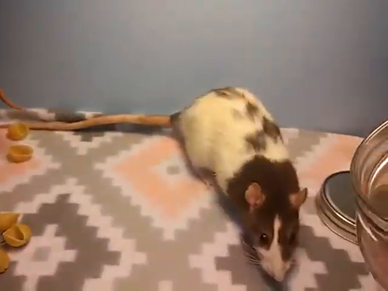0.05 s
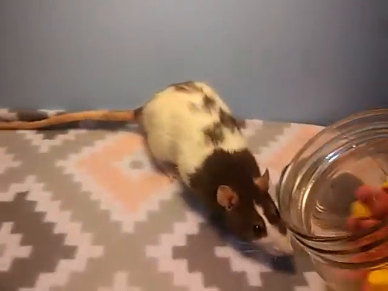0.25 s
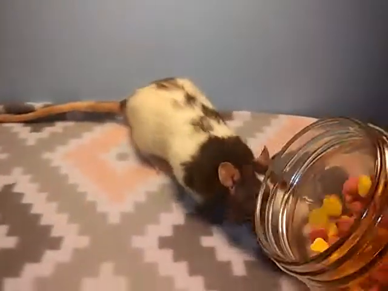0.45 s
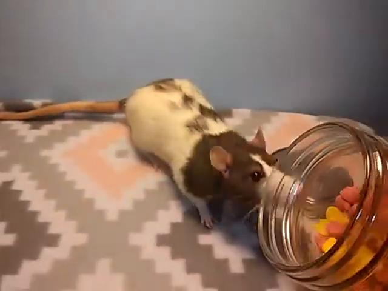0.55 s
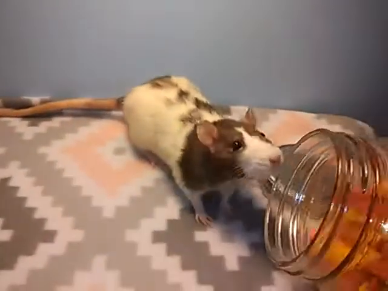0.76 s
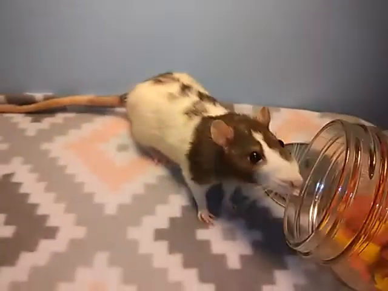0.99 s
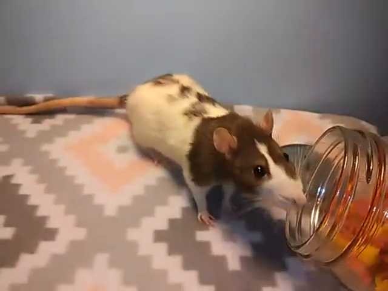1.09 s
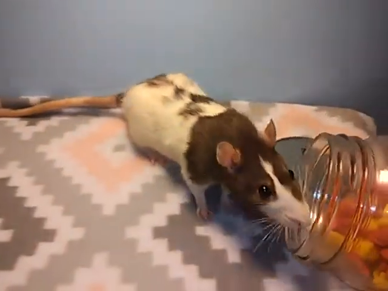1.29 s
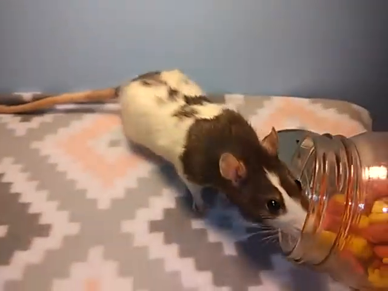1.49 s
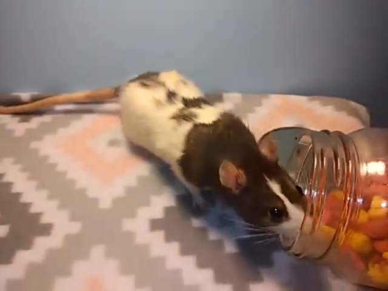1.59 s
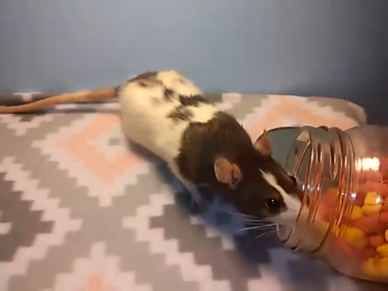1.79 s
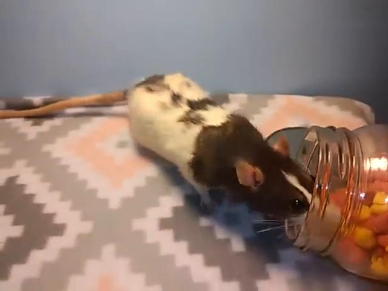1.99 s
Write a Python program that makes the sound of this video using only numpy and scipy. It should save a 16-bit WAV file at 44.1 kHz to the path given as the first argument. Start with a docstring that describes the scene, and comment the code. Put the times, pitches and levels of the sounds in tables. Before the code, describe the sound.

Dry pasta slides and clicks in a tilted glass jar, which clacks once against something hard.

```python
"""In a small room, a glass jar of dry pasta shells is tipped towards a rat, close by on the right.
The shells slide and tick: each contact makes a sharp crack, a brief ping from the shell and a
dull knock from the jar wall. Once, the jar chatters against something hard.
The room adds a short echo. Underneath are the rumble of the moving hand and a faint hum."""
import sys
import numpy as np
from scipy import signal
from scipy.fft import rfft, irfft, next_fast_len
from scipy.io import wavfile
from scipy.ndimage import uniform_filter1d, map_coordinates

SR = 44100
rng = np.random.default_rng(int(sys.argv[2]) if len(sys.argv) > 2 else 0)


def inscribe(sig):
    """Save sig as 16-bit PCM at rate SR to the path in sys.argv[1].

    A 1-D sig is mono; a 2-D sig holds one channel per row.
    Samples are clipped to [-1, 1] before scaling.
    """
    pcm = np.round(np.clip(np.atleast_2d(sig).T, -1, 1) * 32767)
    wavfile.write(sys.argv[1], SR, pcm.astype(np.int16))


N = 90404

# Shells landing. A fade is the time a sound takes to drop by 60 dB.
# start_s, crack_db, treble_tilt_db_per_octave, crack_fade_s, knock_db, ping_hz, ping_db
SHELL_HITS = [(0.1839, -46.5, 10, 0.024, -74, 9260, -55), (0.2072, -47.5, -4, 0.02, -57, 5100, -59),
              (0.216, -45.5, -11, 0.016, -52, 4900, -64), (0.2244, -46, -1.5, 0.008, -51, 8100, -61),
              (0.2457, -34, -0.5, 0.017, -54, 8400, -55), (0.251, -23, 3.5, 0.0084, -46.5, 8000, -30.5),
              (0.2637, -40, 1, 0.02, -55, 8050, -44), (0.268, -51, 9, 0.01, -46, 7800, -57),
              (0.277, -32.5, 6, 0.018, -47.5, 9640, -41), (0.2855, -42, 5, 0.007, -72, 9600, -43),
              (0.3147, -20, 10, 0.0088, -39, 7990, -29), (0.3226, -35, -1, 0.005, -39, 8060, -31.5),
              (0.331, -32.5, 3.5, 0.009, -40.5, 7970, -39), (0.3441, -38.5, -2, 0.022, -47, 8700, -44.5),
              (0.3592, -30.5, 6, 0.007, -48, 8440, -38), (0.365, -46, 19, 0.013, -60, 6760, -45),
              (0.388, -43, -2, 0.016, -57, 6630, -46), (0.397, -46, 5, 0.02, -73, 8350, -59),
              (0.4119, -39, -9.5, 0.0098, -43, 8000, -40), (0.427, -39, 4, 0.011, -43.5, 7640, -36.5),
              (0.4317, -39, -0.5, 0.0065, -53, 8200, -36), (0.4465, -54, -17, 0.011, -55, 5560, -60),
              (0.4673, -60, -10, 0.013, -74, 5730, -61), (0.474, -45.5, -15, 0.0082, -71, 7450, -51),
              (0.4813, -54, -4, 0.018, -63, 5600, -65), (0.4904, -32.5, 12, 0.012, -49, 7840, -35.5),
              (0.5235, -44.5, -7, 0.015, -72, 8700, -52), (0.553, -27.5, 8.5, 0.015, -45, 7900, -34),
              (0.562, -49.5, -9, 0.043, -66, 7800, -57), (0.5678, -53, -9, 0.0094, -60, 8000, -58),
              (0.5947, -40, -2.5, 0.014, -41.5, 8230, -42), (0.6415, -27.5, 6, 0.018, -37.5, 8080, -19),
              (0.741, -64, 11, 0.0098, -87, 5210, -55), (0.7712, -59.5, 2, 0.013, -58.5, 8000, -68),
              (0.7925, -53, -21, 0.026, -52.5, 4850, -63), (0.806, -46, -15, 0.017, -54, 8140, -51),
              (0.8167, -49.5, -21, 0.036, -59.5, 8240, -50.5), (0.8357, -47, 18, 0.0085, -40, 7800, -48),
              (0.8388, -43.5, -11, 0.007, -55, 8300, -42), (0.8547, -35.5, -9.5, 0.0042, -34, 8030, -38.5),
              (0.8624, -45, -13, 0.0095, -49.5, 8180, -50), (0.8801, -50, 4, 0.014, -53, 7970, -54),
              (0.8879, -43.5, -12.5, 0.038, -52.5, 7900, -50), (0.8941, -44, 1, 0.013, -43, 5470, -49),
              (0.947, -50, 20, 0.01, -71, 10740, -54), (0.969, -63, 13, 0.013, -61, 8000, -61),
              (0.9991, -53, 1, 0.021, -52, 8200, -50), (1.0452, -45.5, -7, 0.012, -59, 7940, -47.5),
              (1.507, -54, 3, 0.0096, -86, 9260, -61), (1.5999, -53, -15, 0.013, -48.5, 8440, -62),
              (1.6168, -53, 0.0, 0.008, -66, 7070, -46.5), (1.6264, -39, 1.5, 0.0085, -40, 8000, -32.5),
              (1.6318, -46, -7.5, 0.038, -47.5, 8000, -44), (1.642, -53, -9, 0.035, -50.5, 8100, -65),
              (1.663, -58, -1, 0.011, -56, 5550, -59), (1.6695, -69, -2, 0.033, -62, 5120, -62),
              (1.674, -60, -5.0, 0.016, -54.5, 7970, -68), (1.7841, -35, 3, 0.033, -38.5, 7770, -31),
              (1.791, -65, -4, 0.018, -60, 8140, -37.5), (1.806, -56, 0.5, 0.021, -54, 8010, -70),
              (1.827, -51.5, -3, 0.0067, -56.5, 8050, -47), (1.96, -56, -4, 0.017, -57, 7900, -56),
              (2.021, -53, 4.5, 0.02, -78, 6510, -48)]
# Tone of a shell's crack: pitch_hz, level_db
CRACK_TONE = [(300, -42), (700, -14.5), (950, -16.5), (1400, -9), (1900, -14), (2500, -1), (3100, -19),
              (3700, -4), (5500, 1), (7000, -2.5), (9000, 0.5), (11000, -4.5), (12500, -6.5),
              (14500, -19.5)]
# Notes of the damped jar wall: pitch_hz, level_db, fade_s
WALL_NOTES = [(1512, -20.5, 0.012), (2253, -4.5, 0.018), (2427, 6, 0.018), (2605, 1.5, 0.028),
              (3260, -22, 0.0025)]
# Notes of one shell: multiple_of_ping_pitch, level_db, fade_s
SHELL_NOTES = [(.94, 1.5, 0.0044), (1, 14, 0.0099), (1.06, -2.5, 0.0019)]
# Loudness of the sliding pile: time_s, level_db
SLIDE_LEVELS = [(0, -105), (.15, -75.5), (.22, -56.5), (.27, -49), (.30, -52.5), (.35, -49), (.40, -50),
                (.50, -54), (.58, -60), (.72, -64), (.78, -66), (.87, -54.5), (.93, -61.5), (1.05, -67.5),
                (1.2, -75), (1.43, -86), (1.46, -53), (1.53, -69.5), (1.64, -62.5), (1.72, -68),
                (1.81, -61.5), (1.9, -71.5), (2.05, -72)]
# The jar's taps on something hard: start_s, level_db
JAR_TAPS = [(1.4488, -25.5), (1.4526, -28.5), (1.4565, -32.5), (1.4602, -43.5)]
# Notes of the tapped jar: pitch_hz, level_db, fade_s
GLASS_NOTES = [(845, -30.5, 0.0069), (1240, -22.5, 0.025), (1486, -27, 0.027), (1883, -10, 0.017),
               (2294, -10, 0.012), (2544, -13.5, 0.034), (4360, -3.5, 0.024), (4600, 2.5, 0.014),
               (4690, -5, 0.014), (5740, -2.5, 0.011), (9270, -14, 0.0025), (10060, 9.5, 0.0043),
               (10340, -17, 0.0024), (12360, -11, 0.0063)]
# Tone of the dry, hollow scrape in each tap: pitch_hz, level_db
CLACK_TONE = [(500, -31.5), (800, -18.5), (1300, -7.5), (2000, -7), (2700, 8.5), (3300, -9), (4000, -8.5),
              (4700, 4.5), (5500, 4.5), (6500, -7.5), (8000, -16), (10200, -3), (12400, -6.5),
              (14500, -22.5)]
# The jar's direct sound on the left, relative to the right: pitch_hz, level_db
LEFT_SHADE = [(500, 0), (1400, -2.5), (2400, 0), (3100, 1), (4200, -5), (5500, -13), (6500, -18),
              (8000, -20), (10000, -24), (14000, -22)]
# What bounces to the left off nearby surfaces: pitch_hz, level_db
BOUNCE_TONE = [(600, -9), (2400, -11), (3500, -8), (5500, -16), (8000, -23), (14000, -25)]
# Tone of the room's echo: pitch_hz, level_db
ROOM_TONE = [(300, -3), (1000, 8.5), (2500, -2), (4700, -6.5), (8000, -9), (11000, -5.5), (14000, -19)]
# Loudness of the hand's rumble: time_s, level_db
RUMBLE_LEVELS = [(0, -39.5), (.06, -65), (.11, -47.5), (.2, -47.5), (.27, -44.5), (.34, -54.5),
                 (.48, -53.5), (.56, -58), (.8, -63), (1.04, -62), (1.17, -39), (1.24, -51), (1.33, -46),
                 (1.42, -61), (1.5, -53.5), (1.7, -52), (1.8, -53.5), (1.86, -51.5), (2.05, -56)]
# Tone of that rumble: pitch_hz, level_db
RUMBLE_TONE = [(12, -56), (22, -31.5), (33, -9.5), (45, -1), (58, 8.5), (72, -16), (110, -13.5),
               (170, -24.5), (300, -30), (800, -64.5)]
# Soft bumps of the hand: start_s, pitch_hz, level_db, rise_s, fall_s
HAND_BUMPS = [(1.068, 44.3, -27.5, 0.033, 0.067), (1.738, 42.3, -34, 0.0334, 0.026)]
# Tone of the steady room air: pitch_hz, level_db
AIR_TONE = [(15, -25), (35, -14), (80, 3.5), (140, 1.5), (190, -10), (260, -3.5), (380, -14), (480, -12),
            (700, -21.5), (1100, -28), (2500, -37.5), (6000, -43.5), (10000, -37), (14000, -34)]
# Loudness of the hum: time_s, level_db
HUM_LEVELS = [(0, -79), (.33, -78.5), (.39, -53.5), (.55, -58), (.62, -65), (.92, -63), (1.05, -73.5),
              (1.6, -64.5), (2.05, -66.5)]

HIT_S, LEVEL_S = 0.04, 0.004  # length of one hit; time span that sets its energy
WALL_RISE_S = 0.00025
TILT_FROM_HZ, TILT_TO_HZ = 3260, 10160


def shells():
    """Single shells hit the glass: each one cracks, knocks the wall and pings."""
    out = np.zeros(N)
    for start_s, crack_db, tilt, fade_s, knock_db, ping_hz, ping_db in SHELL_HITS:
        knock = undb(knock_db) * ring(WALL_NOTES, WALL_RISE_S, pitch_spread=0.015)
        click = undb(crack_db) * crack(CRACK_TONE, tilt, fade_s)
        add(out, start_s, click + knock + undb(ping_db) * ping(ping_hz))
    return out


def crack(tone, tilt=0, fade_s=0.012, rise_s=0.00015, snap_share=0.16):
    """A brittle contact: a sharp snap that scatters quickly inside the jar."""
    t = seconds(int(HIT_S * SR))
    scatter = rng.standard_normal(len(t)) * undb(-60 * t / fade_s) * (1 - np.exp(-t / rise_s))
    snap = signal.unit_impulse(len(t), int(2 * rise_s * SR))
    contact = np.sqrt(1 - snap_share) * level_hit(scatter) + np.sqrt(snap_share) * level_hit(snap)
    return level_hit(shape_tone(contact, tone, tilt))


def ping(pitch_hz):
    """One shell rings briefly on three close notes."""
    notes = [(pitch_hz * multiple, db, fade_s) for multiple, db, fade_s in SHELL_NOTES]
    return ring(notes, rise_s=0.00054, pitch_spread=0.004)


def ring(notes, rise_s, pitch_spread=0):
    """A struck object's fading notes. With a spread, the spot hit shifts their pitch and phase."""
    t = seconds(int(HIT_S * SR))
    out = np.zeros(len(t))
    for pitch_hz, level_db, fade_s in notes:
        shift, phase = rng.standard_normal(2) * (pitch_spread > 0)
        wave = np.sin(2 * np.pi * pitch_hz * (1 + pitch_spread * shift) * t + phase)
        out += undb(level_db - 60 * t / fade_s) * wave
    return level_hit(out * (1 - np.exp(-(t / rise_s) ** 2)))


def sliding_pile(ticks_per_s=500, spread_db=14, rub_db=6.5):
    """The pile shifts: tiny contacts and smooth rubbing rustle and set the wall and shells ringing."""
    ticks = (rng.random(N) < ticks_per_s / SR) * rng.choice([-1, 1], N)
    strengths = undb(spread_db * np.clip(rng.standard_normal(N), -2, 2))
    push = level_one(level_one(ticks * strengths) + undb(rub_db) * rng.standard_normal(N))
    body = undb(-7.5) * ring(WALL_NOTES, WALL_RISE_S) + undb(-14) * ping(pitch_hz=7600)
    rustle = level_one(shape_tone(push, CRACK_TONE, tilt=-0.54))
    ringing = signal.fftconvolve(push, body)[:N] / np.sqrt(LEVEL_S * SR)
    return level_one(rustle + ringing) * loudness(SLIDE_LEVELS)


def jar_chatter():
    """The jar skips on something hard, so fast that the taps make one clack."""
    out = np.zeros(N)
    for start_s, level_db in JAR_TAPS:
        glass = ring(GLASS_NOTES, rise_s=0.00047, pitch_spread=0.0041)
        scrape = undb(-1) * crack(CLACK_TONE)
        add(out, start_s, undb(level_db) * (glass + scrape))
    return out


def nearby_bounces(sound, peak_s=0.0018):
    """Quick echoes off the floor and the room's wall."""
    t = seconds(int(HIT_S * SR))
    echoes = rng.standard_normal(len(t)) * t * np.exp(-t / peak_s)
    echoes /= np.sqrt(np.sum(echoes ** 2))
    return shape_tone(signal.fftconvolve(sound, echoes)[:N], BOUNCE_TONE)


def room_echo(sound, fade_s=0.2, rise_s=0.004):
    """Many echoes blur into a short tail, quieter on the left."""
    t = seconds(N // 2)
    swell = 1 - np.exp(-(t / rise_s) ** 2)
    tail = rng.standard_normal((2, len(t))) * undb(-60 * t / fade_s) * swell
    tail = shape_tone(tail / np.sqrt(np.sum(tail[0] ** 2)), ROOM_TONE)
    return signal.fftconvolve(sound[None], tail, axes=1)[:, :N] * undb([[-19], [-12.5]])


def hand_rumble():
    """The moving hand makes a low rumble and two soft bumps."""
    out = noise(RUMBLE_TONE) * loudness(RUMBLE_LEVELS)
    t = seconds(N // 2)
    for start_s, pitch_hz, level_db, rise_s, fall_s in HAND_BUMPS:
        swell = np.minimum(t / rise_s, np.exp((rise_s - t) / fall_s))
        add(out, start_s, undb(level_db) * np.sin(2 * np.pi * pitch_hz * t) * swell)
    return out


def room_air():
    """A soft, steady rush whose bass is alike on both sides."""
    middle = noise(AIR_TONE)
    side = cut_bass(noise(AIR_TONE), below_hz=590, steepness=1)
    return undb(-61) * np.array([middle + side, middle - side])


def hum(centre_hz=150.1, flutter_db=1.65):
    """A faint low note that wavers in pitch and loudness."""
    pitch_hz = centre_hz * (1 + 0.013 * wander(samples=2000))
    wave = np.sqrt(2) * np.sin(2 * np.pi * np.cumsum(pitch_hz) / SR)
    return wave * loudness(HUM_LEVELS) * undb(flutter_db * wander(samples=1200))


def shape_tone(sound, tone, tilt=0):
    """Filter by a tone table; tilt brightens or dulls the treble, in dB per octave."""
    n = 2 * next_fast_len(sound.shape[-1])
    hz, db = np.array(tone).T
    db = db + tilt * np.log2(np.clip(hz, TILT_FROM_HZ, TILT_TO_HZ) / TILT_FROM_HZ)
    shape_db = np.interp(np.log(np.arange(n // 2 + 1) * SR / n + 1), np.log(hz), db)
    # Fold the filter forward in time, so nothing sounds before the hit.
    folded = irfft(np.log(undb(shape_db)))
    folded[1:n // 2] *= 2
    folded[n // 2 + 1:] = 0
    return irfft(rfft(sound, n) * np.exp(rfft(folded)))[..., :sound.shape[-1]]


def cut_bass(sound, below_hz, steepness=3):
    """Turn down what lies below a pitch."""
    return signal.sosfilt(signal.butter(steepness, below_hz, "high", fs=SR, output="sos"), sound)


def noise(tone):
    """Steady noise with the given tone."""
    return level_one(shape_tone(rng.standard_normal(N), tone))


def wander(samples):
    """A smooth random drift; more samples make it slower."""
    return level_one(uniform_filter1d(uniform_filter1d(rng.standard_normal(N), samples), samples))


def seconds(samples):
    """The time of each sample."""
    return np.arange(samples) / SR


def undb(db):
    """Turn decibels into a multiplier."""
    return 10 ** (np.asarray(db) / 20)


def loudness(points):
    """Join time_s, level_db points into a changing multiplier."""
    return undb(np.interp(seconds(N), *np.array(points).T))


def level_one(sound):
    """Scale to an average (rms) level of 1."""
    return sound / np.sqrt(np.mean(sound ** 2))


def level_hit(sound):
    """Give a hit the energy of a level-1 sound lasting LEVEL_S."""
    return sound * np.sqrt(LEVEL_S * SR / np.sum(sound ** 2))


def add(track, start_s, sound):
    """Mix a sound in at its start time."""
    i = int(start_s * SR)
    track[i:i + len(sound)] += sound[:max(N - i, 0)]


def scene(left_lead_s=0.00001):
    """The right side hears the jar directly; the left hears it duller, plus nearby bounces."""
    jar = cut_bass(shells() + sliding_pile() + jar_chatter(), below_hz=750)
    shaded = map_coordinates(shape_tone(jar, LEFT_SHADE), [np.arange(N) + left_lead_s * SR])
    left = shaded + nearby_bounces(jar)
    echo = room_echo(jar)
    background = cut_bass(hand_rumble() + room_air() + hum(), below_hz=31)
    return np.array([left, jar]) + echo + background


def record(dry):
    """Cut off the highest treble, above 14250 Hz."""
    return signal.sosfilt(signal.butter(20, 14250, fs=SR, output="sos"), dry)


dry = scene()
out = record(dry)
inscribe(out)
```